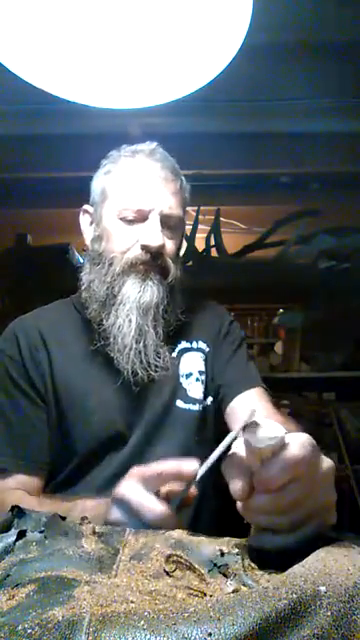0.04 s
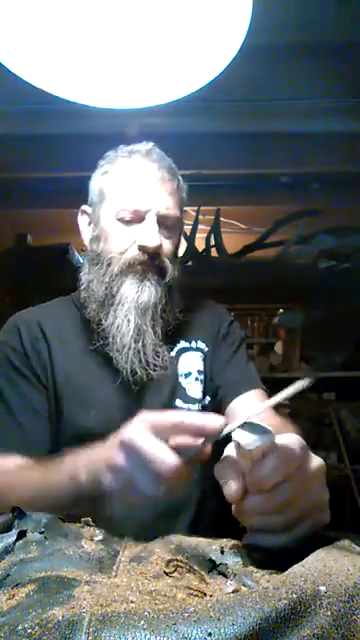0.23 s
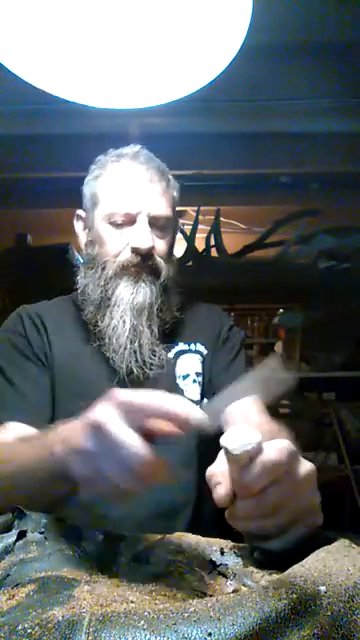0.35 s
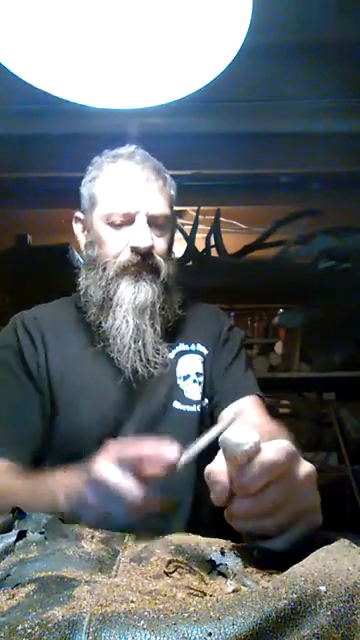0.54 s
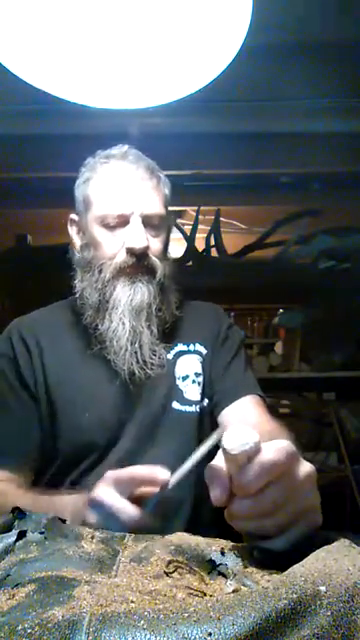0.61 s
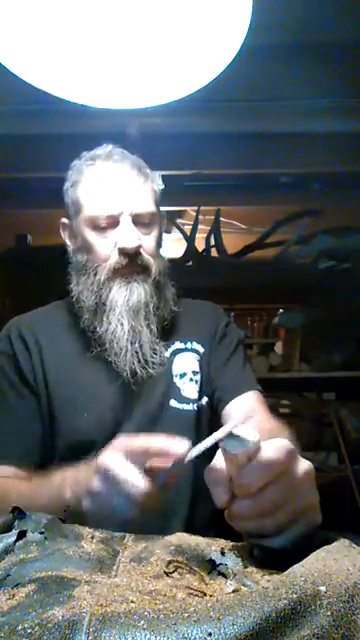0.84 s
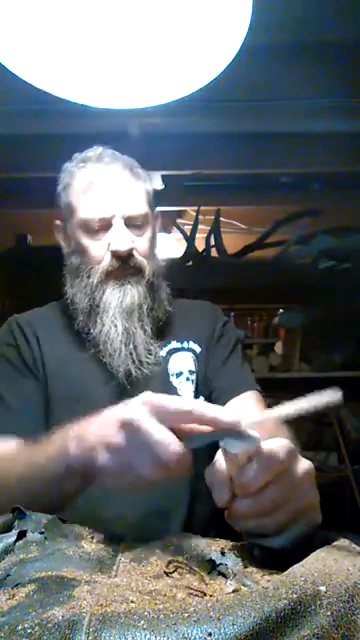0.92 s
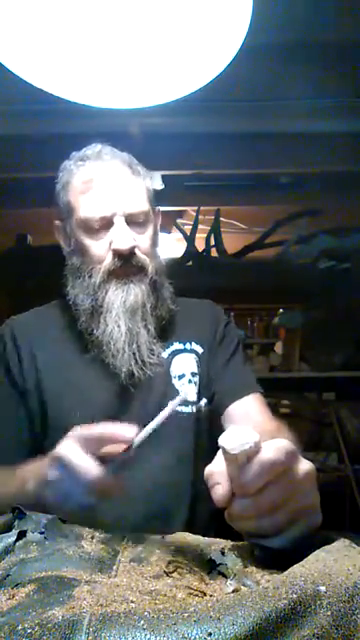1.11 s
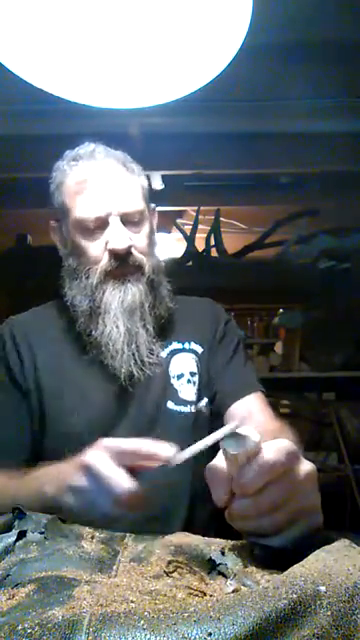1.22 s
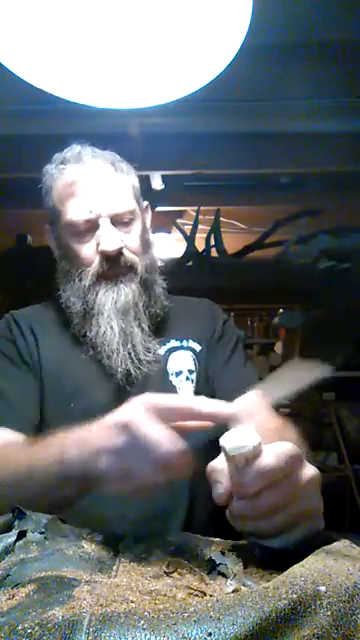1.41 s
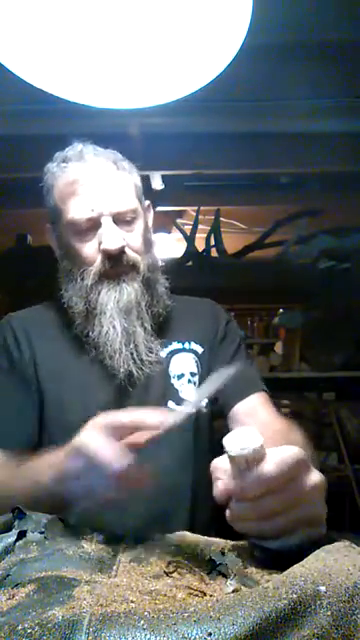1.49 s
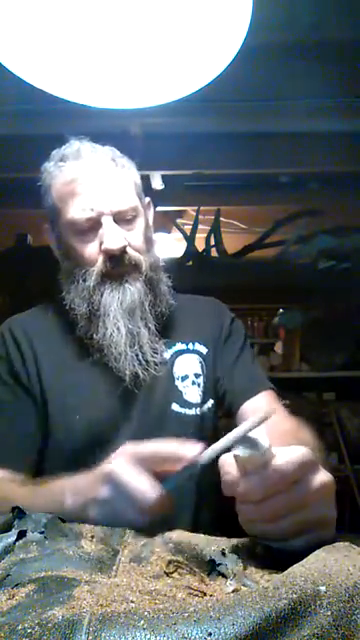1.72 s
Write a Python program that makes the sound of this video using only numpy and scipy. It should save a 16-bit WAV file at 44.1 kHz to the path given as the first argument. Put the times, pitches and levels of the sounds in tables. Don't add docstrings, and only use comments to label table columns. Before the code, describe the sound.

A hand file rasps dry wood in four main strokes; light taps come first, a loud bench thump falls between the second and third, and a hard clack opens the last. Small quiet workshop, close stereo microphones.

```python
import sys
import numpy as np
from scipy import signal
from scipy.fft import rfft, irfft, next_fast_len
from scipy.io import wavfile
from scipy.ndimage import uniform_filter1d

SR = 44100
rng = np.random.default_rng(int(sys.argv[2]) if len(sys.argv) > 2 else 0)


def volts_from_db(level):
    exponent = np.asarray(level, float) / 20
    return 10 ** exponent


def materialize(psi):
    bounded = np.clip(np.atleast_2d(psi).T, -1, 1)
    quanta = np.round(bounded * 32767).astype(np.int16)
    wavfile.write(sys.argv[1], SR, quanta)


N = 77175

# frequency in Hz, level in dB, t60 in seconds.
STICK_MODES = [(136.4, 0.5, 0.042), (221.5, 4.5, 0.19), (349.2, -7.5, 0.12), (450, -3, 0.064),
               (520, 5, 0.045), (588.3, -0.5, 0.12), (685, -6.5, 0.1), (878, -3, 0.045), (1402, -2, 0.027),
               (1475, 6.5, 0.04), (1962, -4.5, 0.0716), (2201, -2.5, 0.03), (3027, -6, 0.063)]


def in_time(rows):
    s, *columns = np.transpose(rows)
    return [np.interp(np.arange(N) / SR, s, c) for c in columns]


def at_hz(points, hz):
    f, v = np.transpose(points)
    return np.interp(np.log(hz + 1), np.log(f + 1), v)


def rms_one(x):
    return x / np.sqrt(np.mean(x ** 2) + 1e-20)


def drift(rate_hz):
    r = np.exp(-2 * np.pi * rate_hz / SR)
    slow = signal.lfilter([1], [1, -2 * r, r * r], rng.standard_normal(N + SR))
    return rms_one(slow[SR:])


def colour(x, spectrum):
    gain = volts_from_db(at_hz(spectrum, np.fft.rfftfreq(N, 1 / SR)))
    return rms_one(irfft(rfft(x) * gain, N))


def ring(force, modes):
    out = 0
    for k, (hz, db, t60) in enumerate(modes):
        r, w = volts_from_db(-60 / (t60 * SR)), 2 * np.pi * hz / SR
        mode = signal.lfilter([0, np.sin(w)], [1, -2 * r * np.cos(w), r * r], force + 1e-18)
        out = out + (-1) ** k * volts_from_db(db) * mode
    return out


def knocks(rows, modes):
    crack_s = 0.00427
    out, t = np.zeros(N + SR), np.arange(SR) / SR
    chance = rng.standard_normal((len(rows), len(modes)))
    noise = rng.standard_normal((len(rows), SR // 10))
    for (s, db, contact_ms, crack_db), own, rough in zip(rows, chance, noise):
        push = t * np.exp(-1000 * t / max(contact_ms, .03))
        struck = [(hz, level + 3 * c, t60) for (hz, level, t60), c in zip(modes, own)]
        sound = ring(push, struck)
        sound = sound / np.abs(sound).max()
        crack = np.diff(rough, prepend=0) * np.exp(-t[:len(rough)] / crack_s)
        sound[:len(rough)] += volts_from_db(crack_db) * crack
        i = int(s * SR)
        out[i:i + SR] += volts_from_db(db) * sound
    return out[:N]


def filing():
    # time in seconds, level in dB.
    passes = [
        [(0, -63), (.014, -50.5), (.04, -59), (.1, -65)],
        [(.125, -59.5), (.16, -42), (.22, -32.5), (.262, -30.5), (.31, -35), (.385, -33.5), (.414, -28.5),
         (.43, -35.5)],
        [(.466, -40.5), (.482, -33), (.536, -50)],
        [(.606, -56), (.614, -47), (.645, -49.5), (.682, -61.5), (.728, -66), (.734, -60), (.76, -66)],
        [(.826, -76), (.833, -57), (.86, -43.5), (.882, -41), (.944, -31), (.978, -30), (1.05, -31),
         (1.075, -37.5), (1.126, -51.5), (1.174, -59.5)],
        [(1.341, -78), (1.349, -37.5), (1.41, -32), (1.486, -30.5), (1.534, -41.5), (1.564, -47.5)],
        [(1.62, -52.5), (1.685, -57), (1.75, -59)],
    ]
    # time in seconds, tooth rate in Hz, bite of the teeth in dB.
    stroke_a = [(0.185, 498.2, -35), (.197, 567.5, -26.5), (0.213, 740.5, -36.5), (0.229, 495, -19),
                (0.248, 520, -32.5), (.27, 325.8, -28.5), (.3, 212.6, -52)]
    stroke_b = [(.322, 207, -30.5), (0.335, 223.6, -35), (0.354, 329.4, -16.5), (0.373, 356.3, -21),
                (.396, 494.3, -16), (0.406, 534, -22.5), (0.418, 536, -45), (0.44, 544, -50)]
    stroke_c = [(0.839, 205.2, -27), (.89, 226.9, -34), (.92, 328.8, -37.5), (.94, 510, -28.5),
                (0.967, 569.4, -31), (0.999, 698.6, -42.5), (1.041, 583.4, -29), (1.071, 450, -49),
                (1.106, 194.4, -47)]
    stroke_d = [(1.379, 431.3, -29.5), (1.4, 479.5, -40.5), (1.416, 605.6, -26), (1.425, 721, -32.5),
                (1.449, 760.8, -41), (1.466, 717, -38), (1.476, 627, -32), (1.501, 482.7, -37.5),
                (1.524, 234.4, -40)]
    catch = [
        (0, 4, 0, -8.5, -22),
        (-8, 2, 1.5, -30.5, -30),
        (-9.5, 6.5, -11.5, -2.5, -9),
        (6, 3.5, 1.5, 0, -6),
    ]
    # frequency in Hz, level in dB, t60 in seconds.
    steel_modes = [(1482, 9, 0.055), (1951, -1, 0.061), (2228, 4.5, .025), (2500, -7.5, 0.055),
                   (3138, -5, 0.075), (3377, 4.5, 0.029), (3830, -7, 0.023), (4350, -10, .035),
                   (4810, -0.5, 0.042), (5170, 1, .03), (5790, -6.5, 0.0244), (6070, -12, 0.03),
                   (6870, -8.5, 0.0375)]
    fibres_per_s, fibre_spread_db = 7000, 1.9

    hiss_db, = in_time(sum(passes, []))
    press = volts_from_db(hiss_db + 1.8 * drift(21.5))
    strokes = (stroke_a, stroke_b, stroke_c, stroke_d)
    tone, catches = np.sum([teeth(s, *c) for s, c in zip(strokes, catch)], axis=0)
    catches = signal.lfilter(*signal.butter(1, 1300, "high", fs=SR), catches)
    torn = rng.random((2, N)) < fibres_per_s / SR
    fibres = torn * volts_from_db(fibre_spread_db * rng.exponential(1, (2, N))) * rng.choice([-1, 1], (2, N))

    body = tone + volts_from_db(-16.5) * press * rms_one(catches)
    body = body + volts_from_db(-7.5) * ring(press * catches, STICK_MODES) / np.std(ring(catches, STICK_MODES))
    tearing = press * volts_from_db(0.99 * (hiss_db + 27.5)) * fibres[0]
    body = body + volts_from_db(-1.5) * ring(tearing, STICK_MODES) / np.std(ring(fibres[0], STICK_MODES))
    alike, apart = press * hiss(fibres, -34.0 - hiss_db) * volts_from_db(1.0)
    steel = volts_from_db(-5) * rms_one(ring(fibres, steel_modes)) + volts_from_db(-8.5) * rms_one(ring(catches, steel_modes))
    steel = steel * press * volts_from_db(0.2 * (hiss_db + 22.5))
    return body + alike + steel[0], apart + steel[1]


def teeth(stroke, octave_db, uneven_db, rung_db, direct_db, upper_db):
    multiples_db = [0, -7, -9.5, -12]
    before = (stroke[0][0] - .01, stroke[0][1], -80)
    after = (stroke[-1][0] + 0.0094, stroke[-1][1], -80)
    rate, bite_db = in_time([before, *stroke, after])
    turns = np.cumsum(rate * (1 + .025 * drift(120))) / SR
    waves = []
    for k, db in ((1, 0.003), (2, octave_db)):
        level_db = bite_db + db + uneven_db * np.clip(drift(74), -3, 1)
        waves.append(volts_from_db(level_db) * np.sin(2 * np.pi * k * turns))
    tone, octave = waves
    sound = ring(300 / SR * (volts_from_db(rung_db) * tone + octave), STICK_MODES) + volts_from_db(direct_db) * tone
    upper = sum(volts_from_db(db) * np.sin(2 * np.pi * (k + 2) * turns) for k, db in enumerate(multiples_db))
    sound = sound + volts_from_db(bite_db + upper_db + uneven_db * drift(41)) * upper
    catches = (np.diff(np.floor(turns), prepend=0) - rate / SR) * (bite_db > -79)
    return sound, catches


def hiss(fibres, light_db):
    # frequency in Hz, level in dB per Hz.
    torn_wood = [(180, -67), (300, -18.5), (531, -8.5), (1130, -17), (1460, -16), (1670, -10), (9560, -13),
                 (13900, -22.5), (14900, -54)]
    ripple_db, ripple_hz = 2.6, 38.8
    patchy_db, tilt_db = 2.5, 0.2041
    hz, spectrum = np.fft.rfftfreq(N, 1 / SR), rfft(colour(fibres, torn_wood), axis=1)
    width = int(ripple_hz * N / SR)
    ripple = uniform_filter1d(uniform_filter1d(rng.standard_normal(len(hz)), width), width)
    spectrum = spectrum * volts_from_db(ripple_db * rms_one(ripple))
    out = 0
    for k in range(7):
        band = np.clip(1 - np.abs(np.log2((hz + 1) / 250) - k), 0, 1)
        level_db = patchy_db * drift(4.23) + tilt_db * light_db * (k - 4.5)
        out = out + volts_from_db(level_db) * irfft(spectrum * band, N)
    return rms_one(out)


def landings():
    # start in seconds, peak level in dB, contact in ms, crack in dB.
    blows = [
        (.613, -70, 0.045, -9),
        (.831, -23.5, 0.48, -36),
        (.838, -25, 0.24, -34),
        (.847, -32, 0.22, -36),
        (1.3462, -13.5, 0.26, -30),
        (1.351, -17, 0.083, -26),
        (1.358, -12, 0.297, -39),
        (1.364, -33.5, 0.248, -21),
    ]
    return knocks(blows, STICK_MODES)


def first_taps():
    # start in seconds, peak level in dB, contact in ms, crack in dB.
    blows = [
        (.0095, -20, 0.86, -41),
        (.0135, -17.5, 0.26, -48),
        (.018, -19, 0.25, -47.5),
        (.026, -25, 0.35, -32.5),
        (.041, -36, 0.4, -42),
        (.062, -42, 0.29, -38),
        (.08, -45, 0.12, -37),
    ]
    # frequency in Hz, level in dB, t60 in seconds.
    tapped_modes = [(157, 0.5, 0.037), (223, -5, 0.082), (573, 0, 0.088), (839, -3.5, 0.16),
                    (1150, 4.5, 0.052), (1415, 11, 0.046), (2076, 5, 0.039)]
    return knocks(blows, tapped_modes)


def grit():
    # start in seconds, peak level in dB, length in ms.
    skips = [
        (.0095, -40, 8.1),
        (.613, -47, 5),
        (.63, -41, 4.3),
        (0.647, -47, 8.3),
        (0.7318, -57, 4),
        (.744, -61, 3.8),
        (0.832, -54, 14),
        (.477, -44, 6.2),
    ]
    # frequency in Hz, level in dB, t60 in seconds.
    grain_modes = [(2380, 5.5, .006), (3360, -0.5, 0.024), (4120, 7, 0.0092), (5050, -10.5, 0.0028),
                   (7300, -4.5, .008)]
    out, t = np.zeros(N), np.arange(N) / SR
    grains = rms_one(ring(rng.standard_normal(N) ** 3, grain_modes))
    for s, db, length_ms in skips:
        out += volts_from_db(db) * (t > s) * np.exp(-1000 * np.clip(t - s, 0, 1) / max(length_ms, 1))
    return out * grains


def bench_bumps():
    # start in seconds, peak level in dB, contact in ms.
    bumps = [(0.222, -20.5, 0.71), (.252, -17, 5.8), (0.272, -34, 0.72), (.4685, -1, 0.46),
             (0.4731, -5.5, 0.12), (.478, -20.5, 0.17), (.484, -9.5, 0.34), (0.489, -28.5, 0.22),
             (0.503, -16.5, 1), (.571, -23.5, 1.2), (0.581, -44, 1.2), (0.612, -29.5, 2.1),
             (0.7295, -22.5, 1.4), (0.739, -36.5, 1.05), (0.75, -51, 0.26), (1.249, -56, 0.25),
             (1.597, -35, 1.8), (1.652, -40.5, 1.05)]
    # frequency in Hz, level in dB, t60 in seconds.
    bench_modes = [(58.6, -15, 0.2), (103, -15.5, 0.18), (146.7, -1, 0.046), (224.7, -2.5, 0.091),
                   (303.7, -4, 0.084), (422, -2.5, 0.064), (555, 0, 0.054), (686, 2, 0.028),
                   (842, 3, 0.056), (976, 3.5, 0.066), (1141, -1.5, 0.049), (1490, -0.5, 0.0083),
                   (2210, -5, 0.025)]
    crack_db = -51.5
    return knocks([(*b, crack_db) for b in bumps], bench_modes)


def bench_rumble():
    # time in seconds, level in dB.
    shake = [(0, -61), (.12, -48), (.16, -33.5), (.26, -36.5), (.42, -37.5), (.53, -26.5), (.6, -27.5),
             (.69, -44.5), (.95, -40.5), (1.12, -42.5), (1.19, -62.5), (1.33, -65), (1.5, -42.5),
             (1.6, -44.5), (1.75, -45.5)]
    # frequency in Hz, level in dB per Hz.
    rumble_spectrum = [(18, -33.5), (55, 3), (82, -3), (150, 1.5), (524, -24), (700, -43), (910, -65),
                       (1540, -120)]
    shake_db, = in_time(shake)
    return volts_from_db(shake_db + 2.2 * drift(8.0)) * colour(rng.standard_normal(N), rumble_spectrum)


def brush():
    # time in seconds, level in dB.
    strokes = [(1.17, -79.5), (1.2, -62), (1.23, -58.5), (1.3, -67), (1.5, -75), (1.56, -52), (1.65, -51),
               (1.682, -43.5), (1.75, -51)]
    # frequency in Hz, level in dB per Hz.
    rustle = [(180, -30.5), (450, 6.5), (900, -10.5), (1250, -18), (1850, -9.5), (3380, -7.5), (8860, 3),
              (14000, -9)]
    level_db, = in_time(strokes)
    noise = np.array([colour(v, rustle) for v in rng.standard_normal((2, N))])
    return volts_from_db(level_db + 0.81 * drift(25)) * noise


def room_air():
    # frequency in Hz, level in dB per Hz.
    air_spectrum = [(59, -24), (100, 9), (400, -14.5), (1210, -27.5), (3000, -24.5), (7930, -15),
                    (13700, -26.5), (14900, -42.5)]
    return volts_from_db(-69) * np.array([colour(v, air_spectrum) for v in rng.standard_normal((2, N))])


def ports(alike, apart):
    # frequency in Hz, difference in dB.
    left_db = [(40, 3), (150, 2), (350, 4), (700, 8), (1400, 6.5), (2800, 3), (5600, 5.5), (9500, -2.5),
               (13000, 3)]
    # frequency in Hz, lead in radians.
    lead = [(40, 0), (130, .1), (215, .4), (340, .8), (520, 1.4), (860, 2.2), (1200, 4.3), (1460, 6.6),
            (3400, 6.5), (14000, 7)]
    # frequency in Hz, coherence from 0 to 1.
    likeness = [(60, 0.49), (300, 0.63), (1400, 0.3), (8000, 0.033)]
    hz = np.fft.rfftfreq(N, 1 / SR)
    c, side = np.clip(at_hz(likeness, hz), 0, 1), np.array([[1], [-1]])
    both = np.sqrt((1 + c) / 2) * rfft(alike) + side * np.sqrt((1 - c) / 2) * rfft(apart)
    level = volts_from_db(side * at_hz(left_db, hz) / 2)
    phase = np.exp(.5j * side * at_hz(lead, hz))
    return irfft(both * level * phase, N) * volts_from_db(1.0)


def workshop(x):
    t60_s, wall_cut_hz = 0.26, 18000
    size = next_fast_len(N + SR)
    hz, spectrum = np.fft.rfftfreq(size, 1 / SR), rfft(x, size)
    out = np.zeros((2, size // 2 + 1), complex)
    for k, lag in enumerate(rng.uniform(.009, .03, 12)):
        loop = volts_from_db(-60 * lag / t60_s) * np.exp(-2j * np.pi * hz * lag) / (1 + 1j * hz / wall_cut_hz)
        out[k % 2] += (-1) ** (k // 2) * loop / (1 - loop)
    return irfft(out * spectrum, size)[:, :N]


def scene():
    file, other = filing()
    near = file + landings() + bench_bumps() + first_taps() + grit()
    rumble = bench_rumble()
    air = room_air() + brush()
    return ports(near + rumble + air[0], other + air[1]) + volts_from_db(-23.5) * workshop(near)


def roll_off(x):
    return signal.sosfilt(signal.butter(12, 15010, fs=SR, output="sos"), x)


def record(dry):
    limit = 1.25
    x = signal.sosfilt(signal.butter(4, 42, "high", fs=SR, output="sos"), dry)
    x = limit * np.tanh(x / limit)
    x = signal.sosfilt(signal.ellip(10, .5, 70, 14400, fs=SR, output="sos"), x)
    return roll_off(x)


dry = scene()
out = record(dry)
materialize(out)
```